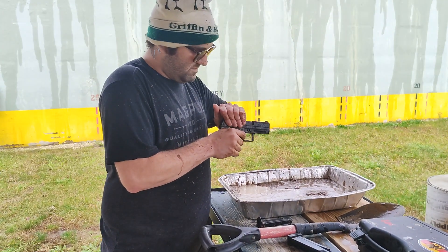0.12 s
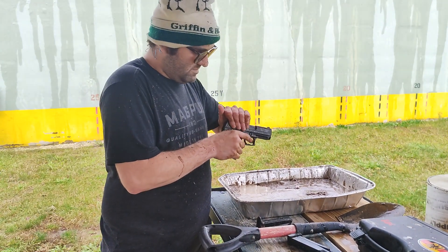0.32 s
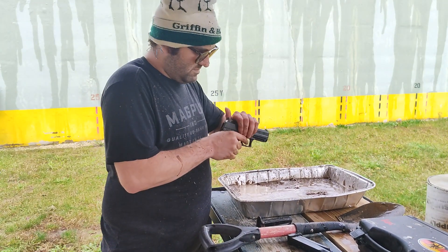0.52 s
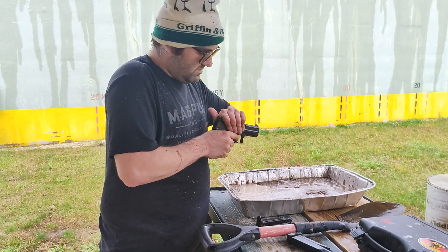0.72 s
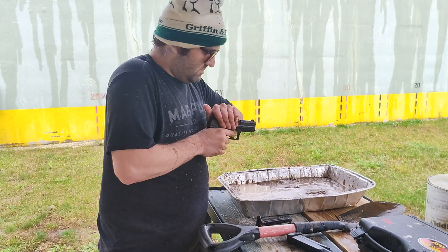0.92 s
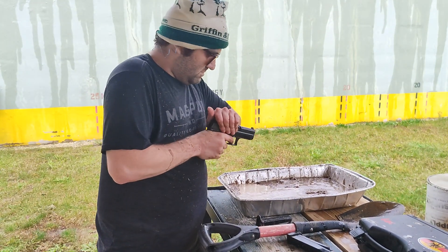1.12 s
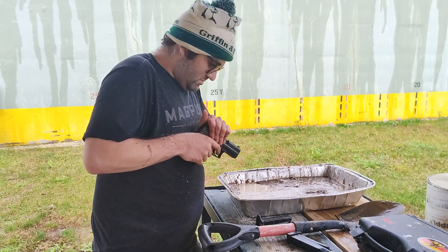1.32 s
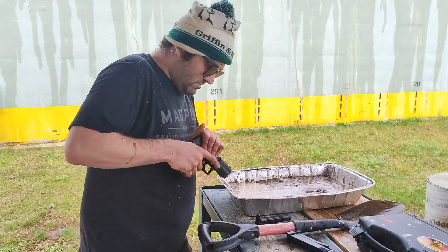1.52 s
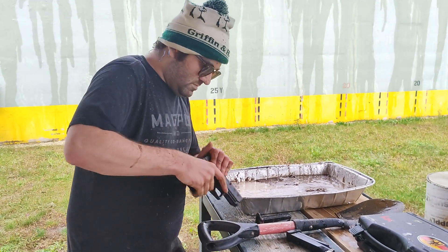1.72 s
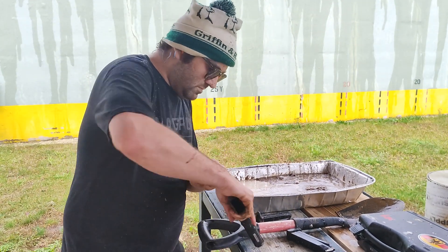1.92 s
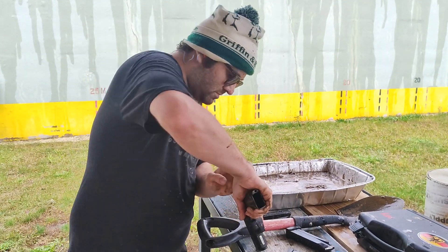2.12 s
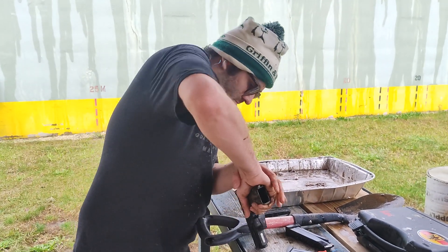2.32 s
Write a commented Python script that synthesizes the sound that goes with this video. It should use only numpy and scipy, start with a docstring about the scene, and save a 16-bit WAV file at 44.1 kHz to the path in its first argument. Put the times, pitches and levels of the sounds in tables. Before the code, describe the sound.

A jammed pistol slide is forced by hand: a faint scrape, then one loud, sharp steel slam at 0.24 s with a hollow thump and short echoes off ground and walls. Lighter clicks come at 0.42, 1.2 and 1.3 s, then tiny ticks. Soft wooden table knocks sound at 2.1 and 2.35 s with clicks. Low wind thumps on the left, quiet field hush, faint high bird chirps near 1 and 2.2 s.

```python
"""A jammed pistol slide outdoors

Hands force the slide: one loud slam and small steel clicks, made of scraping noise and dying sines.
The hollow grip thumps, then the muzzle knocks a wooden table, which booms and shakes its load.
Scattered taps and smeared noise return the blows from field and walls; a small bird sings gliding sines.
Wind thumps the left microphone port in short rough cycles, over the hush of the field in filtered noise."""
import sys
import numpy as np
from scipy import signal
from scipy.fft import rfft, irfft
from scipy.io import wavfile
from scipy.ndimage import uniform_filter1d

SR = 44100
rng = np.random.default_rng(int(sys.argv[2]) if len(sys.argv) > 2 else 0)


def volts_from_decibels(level):
    """Turn decibel levels (scalar or array-like) into linear amplitude factors."""
    exponent = np.asarray(level, float) / 20
    return 10 ** exponent


def output_pcm(signal):
    """Save a mono or channel-first signal as 16-bit PCM at the path in sys.argv[1].

    Samples are clipped to [-1, 1] before scaling.
    """
    pcm = np.clip(np.atleast_2d(signal).T, -1, 1) * 32767
    wavfile.write(sys.argv[1], SR, np.round(pcm).astype(np.int16))


N = 105840  # length of the scene in samples

# Colour of the field's hush: f/Hz, relative level per Hz/dB
HUSH_COLOUR = [(40, -18), (75, 0), (130, -9.5), (240, -15), (340, -20.5), (480, -21), (650, -14.5),
               (950, -13.5), (1400, -16.5), (2070, -10.5), (4000, -18), (8300, -26.5), (10500, -28.5),
               (13300, -22), (16300, -39.5)]
# Balance of the hush between the ports: f/Hz, left over right/dB
HUSH_BALANCE = [(60, 0.5), (400, 3.5), (1300, -4), (4400, -3), (8000, 4.5), (11000, -7.5), (15000, -11.5)]
# How alike the hush is in both ports: f/Hz, likeness (0 = unrelated, 1 = the same)
HUSH_LIKENESS = [(60, .7), (300, 0.66), (700, 0), (1400, 0), (3000, 0.054), (8000, 0.44), (15000, 0.076)]
# Rise and fall of the hush: t/s, relative level of the middle/dB, relative level of the treble/dB
HUSH_SWELL = [(0, 6, -10.5), (.09, 8.5, -2.5), (.12, 8, 0.5), (.3, 12.5, 2), (.55, 5.5, -2.5), (.68, 4, -1),
              (.72, 6, 0.5), (0.871, 3, 0), (0.901, 5, 5.5), (1.041, 2.5, -3), (1.2, 4, -4),
              (1.401, 2, -5.5), (1.65, 0, -6), (1.8, 0, 1.5), (2.001, 1, 3.5), (2.251, 0, -0.5),
              (2.32, 8, 6.5), (2.4, -2, 2.5)]
HUSH_DB, HUSH_LATE_S = -55, 0.0005  # the right port hears the hush later
PORT_HZ, PORT_WIDTH_HZ, PORT_DB = 2065, 260, -59  # narrow hiss, strongest in the right port

# Wind eddies breaking on the left port: t/s, level/dB, f/Hz, time from the middle to 1/e/s
WIND_EDDIES = [(0.051, -35.5, 80, 0.013), (0.138, -44, 73, 0.038), (0.299, -44, 73.4, 0.037),
               (0.372, -54, 87.5, 0.056), (0.464, -32.5, 90.6, 0.013), (0.5, -39.5, 80, 0.022),
               (0.607, -41, 80, 0.01), (0.684, -40, 79, 0.023), (0.782, -54.5, 65, 0.021),
               (.91, -58, 110, 0.045), (1.094, -40.5, 80, 0.0088), (1.167, -37.5, 72, .025),
               (1.222, -41, 72.3, 0.016), (1.269, -46, 93, 0.025), (1.331, -47, 60.4, 0.035),
               (1.518, -58, 70.8, 0.016), (1.64, -52.5, 69.2, 0.025), (1.8, -52.5, 83.3, 0.015),
               (1.988, -63, 74.8, .03)]
EDDY_ROUGH = 0.5  # share of a second, faster cycle
RUMBLE_DB, RUMBLE_HZ, RUMBLE_WIDTH_HZ = -63, 80, 74
WIND_RIGHT_DB = -20  # right port against left

# Steel on steel: t/s, level/dB, brightest f/Hz, fall-off per octave squared/dB (sign ignored),
# scrape's time to fall 60 dB/s (held to 0.004-0.3), left over right/dB
STEEL_STRIKES = [(0.18, -41.5, 4000, 8, 0.15, 8), (0.2024, -23, 4970, 1, 0.022, 3.5),
                 (0.2377, -4, 3140, 2.5, 0.013, 4), (.2412, -3.5, 5060, 0, 0.047, 1),
                 (.2430, -2.5, 6000, 3, 0.027, 4), (.2468, -13, 4000, 0, 0.077, -6.5),
                 (0.421, -30, 5800, 16, .03, -4), (0.423, -29, 1770, 21, 0.039, -3.5),
                 (.429, -33.5, 6940, 2, .04, 3), (.481, -36.5, 3800, 7, 0.018, 12.5),
                 (.70, -47, 7250, -4, 0.066, 0), (.889, -43, 8000, -0.5, .06, 0),
                 (1.1918, -30.5, 6200, 25, 0.014, 6), (1.285, -28, 5900, 3, 0.039, 6),
                 (1.293, -30.5, 3850, 2, 0.04, 6.5), (1.367, -49.5, 6930, 2.5, 0.021, -15.5),
                 (1.457, -45, 5000, 2, 0.082, 0), (1.459, -44.5, 13900, 14.5, 0.057, 15),
                 (1.568, -44, 11050, 11.5, .05, 8.5), (1.584, -51.5, 10000, 7.5, .02, -19),
                 (1.661, -47, 4740, -1.5, 0.034, 9.5), (1.691, -50.5, 9000, 1, 0.024, 4.5),
                 (1.809, -48, 4900, 5.5, 0.12, 3.5), (2.135, -47, 6000, -6, 0.07, 3),
                 (2.306, -47, 1220, 10, 0.03, 0), (2.307, -39.5, 3030, 1, 0.027, 6),
                 (2.337, -34, 4100, 1.5, 0.054, 5), (2.345, -31, 1920, 53, 0.034, -1.5),
                 (2.381, -42.5, 5040, -5, 0.048, 1), (2.393, -37.5, 2970, -0.5, 0.077, 7.5)]
# Ringing of the steel, damped by the hand's grip: f/Hz, relative level/dB, time to fall 60 dB/s
STEEL_MODES = [(1420, -4, .025), (2142, -6, .02), (2523, -4, .025), (2897, -2, .025), (3071, -4, .025),
               (3496, -3, .025), (3996, -8, .02), (4346, -6, .025), (5775, -2, .015), (7250, 0, .013),
               (8936, -8, .012), (11400, -9, .01), (13700, -9, .01)]
# Colour of the scraping noise: f/Hz, relative level per Hz/dB
SCRAPE_COLOUR = [(200, -60), (700, -40), (1150, -22), (1400, -4), (3000, 0), (5000, -4), (8000, -5),
                 (13000, -8), (16000, -16)]
# Balance of the pistol between the ports: f/Hz, left over right/dB
GUN_BALANCE = [(300, 4.5), (1000, 3), (2000, -2), (3000, -4), (5000, 0.5), (8000, -2), (11000, -12.5),
               (15000, -17.5)]
RING_DB, SCRAPE_DB = -11, -8
RIGHT_LATE_S = 0.00095  # the right port hears the steel later

# Scatter from ground and clutter near by: f/Hz, time to fall 60 dB/s
NEAR_DECAY = [(500, 0.34), (1000, 0.18), (2500, 0.29), (5000, 0.25), (10000, 0.12), (16000, 0.27)]
# Scatter from far off: f/Hz, time to fall 60 dB/s
FAR_DECAY = [(500, 1.2), (2500, 1), (8000, 1), (16000, 0.69)]
# Smeared slaps off walls: delay t/s, level/dB, time to fall 60 dB/s
WALL_SLAPS = [(.047, -27.5, 0.042), (.150, -27.5, .09)]
NEAR_DB, FAR_DB = -7, -25.5

# Thumps of the hollow grip under some of the blows: t/s, level/dB
GRIP_THUMPS = [(.203, -42.5), (.238, -17), (1.284, -34), (1.458, -52.5), (1.66, -51), (2.338, -50)]
# Notes of the grip's cavity: f/Hz, relative level/dB, time to fall 60 dB/s
GRIP_MODES = [(960.5, 0, 0.062), (1055, -9.5, 0.044), (769, -18, 0.052)]
# Clean returns of the thump off the walls: delay t/s, level/dB
GRIP_RETURNS = [(.045, -15), (.153, -19.5)]
GRIP_RISE_S = 0.0094

# Chirps of the bird: start t/s, length t/s, level/dB, highest f/Hz of the top line before wobble
BIRD_CHIRPS = [(0.895, 0.06, -59, 8580), (0.967, 0.034, -55, 8730), (0.99, .025, -61, 7580),
               (1.03, 0.056, -56, 8910), (1.123, 0.05, -57.5, 8620), (2.105, 0.055, -58, 8620),
               (2.17, 0.039, -55, 8840), (2.244, 0.054, -57, 8810)]
# Lines of one chirp: distance under the top line f/Hz, level/dB
CHIRP_LINES = [(0, -1.5), (900, 0.5), (1800, -14)]
CHIRP_RISE_HZ, CHIRP_FALL_HZ = 1437, 706
CHIRP_TOP = 0.54  # share of the chirp gone by at its highest pitch
WOBBLE_HZ = 110  # typical (rms) size of the wobble
CHIRP_WET_DB = 4

# Blows of the muzzle on the table: t/s, level/dB, left over right/dB
TABLE_KNOCKS = [(2.118, -35.5, 0), (2.126, -45, -3), (2.298, -48, 3), (2.335, -39, -2.5), (2.344, -38.5, 5),
                (2.39, -51.5, 8)]
# Booming of the wooden top: f/Hz, relative level/dB (varies by blow), time to fall 60 dB/s
TABLE_MODES = [(79, 3.5, 0.1), (118.4, -10.5, 0.38), (174.8, 1.5, 0.28), (199.6, -9.5, 0.15),
               (282, -13, .2), (393, -17.5, 0.12), (544, -15.5, 0.068), (660, -20, 0.076)]
# Colour of the things shaking on the table: f/Hz, relative level per Hz/dB
CLUTTER_COLOUR = [(100, -19), (250, -7), (500, -4.5), (1000, -9), (2500, -6.5), (6000, -44)]
CLUTTER_DB, CLUTTER_T60_S = -21, 0.35


def evened(x):
    """Brings a sound to an rms (average strength) of 1."""
    return x / np.sqrt(np.mean(x ** 2) + 1e-20)


def read(points, hz):
    """Reads a curve between its points, along a logarithmic pitch scale."""
    f, value = np.transpose(points)
    return np.interp(np.log(hz + 1), np.log(f + 1), value)


def add(mix, s, sound):
    """Lays a sound into the mix at s seconds, cutting what runs past the end."""
    part = mix[..., round(s * SR):round(s * SR) + sound.shape[-1]]
    part += sound[..., :part.shape[-1]]


def sides(db):
    """Splits a left-over-right difference in dB into a gain for each port."""
    return volts_from_decibels(np.array([db / 2, -db / 2]))


def coloured(x, gain_at):
    """Filters along the last axis by a gain given for each frequency."""
    spectrum = rfft(x)
    hz = np.fft.rfftfreq(x.shape[-1], 1 / SR)
    return irfft(spectrum * gain_at(hz), x.shape[-1])


def hush():
    """Distant leaves and traffic: patchy noise whose middle and treble swell apart."""
    frames, hz = N // 256 + 5, np.fft.rfftfreq(1024, 1 / SR)
    a, b, c, d, patches = rng.standard_normal((frames, 513, 5)).T
    patches = uniform_filter1d(patches, size=12, axis=0)
    patches = evened(uniform_filter1d(patches, size=10, axis=1))
    t = np.arange(frames) * 256 / SR - 512 / SR
    s, middle, treble = np.transpose(HUSH_SWELL)
    # the treble's swell takes over between 6 and 12 kHz
    share = np.clip(np.log2(hz / 6000 + 1e-9), 0, 1)[:, None]
    swell = (1 - share) * np.interp(t, s, middle) + share * np.interp(t, s, treble)
    same = np.clip(read(HUSH_LIKENESS, hz), -1, 1)[:, None]
    left = a + 1j * b
    right = same * left + np.sqrt(1 - same ** 2) * (c + 1j * d)
    z = np.array([left, right])
    gain = volts_from_decibels(read(HUSH_COLOUR, hz)) * sides(read(HUSH_BALANCE, hz))
    z *= gain[:, :, None] * volts_from_decibels(0.85 * patches + swell)
    z[1] *= np.exp(-2j * np.pi * hz * HUSH_LATE_S)[:, None]  # turning phases delays the right port
    noise = signal.istft(z, nperseg=1024, noverlap=768)[1][:, :N]
    return volts_from_decibels(HUSH_DB) * evened(noise)


def port_hiss():
    """A narrow band of noise heard almost only on the right."""
    noise = rng.standard_normal(N)
    band = coloured(noise, lambda f: 1 / (1 + ((f - PORT_HZ) * 2 / PORT_WIDTH_HZ) ** 2))
    return volts_from_decibels(PORT_DB) * evened(band) * volts_from_decibels(np.array([[-25], [0]]))


def wind():
    """Eddies thump the left port with a few rough cycles each, over a faint rumble of low noise."""
    t = np.arange(-4096, 4096) / SR
    noise = rng.standard_normal(N)
    rumble = coloured(noise, lambda f: f / (1 + ((f - RUMBLE_HZ) * 2 / RUMBLE_WIDTH_HZ) ** 2) ** 2)
    left = volts_from_decibels(RUMBLE_DB) * evened(rumble)
    for s, db, hz, half in WIND_EDDIES:
        turn = 2 * np.pi * rng.random(2)
        cycles = np.sin(2 * np.pi * hz * t + turn[0])
        cycles = cycles + EDDY_ROUGH * np.sin(2 * np.pi * 1.7 * hz * t + turn[1])
        thump = volts_from_decibels(db) * np.exp(-(t / half) ** 2) * cycles
        skip = max(4096 - round(s * SR), 0)  # leave out what falls before the start
        add(left, s - (4096 - skip) / SR, thump[skip:])
    return left * volts_from_decibels(np.array([[0], [WIND_RIGHT_DB]]))


def ring(modes, t, spread_db, colour):
    """Dying sines of struck steel; every blow and port hears each one a little differently."""
    hz, db, t60 = np.transpose(modes)[:, :, None]
    luck = rng.standard_normal((2, 2, len(modes), 1))  # for level and phase, in two ports
    balance = read(GUN_BALANCE, hz) * np.array([.5, -.5])[:, None, None]
    level = db + spread_db * luck[0] + colour(hz) + balance
    phase = luck[1] * np.log2(hz / 700)
    return (volts_from_decibels(level - 60 * t / t60) * np.sin(2 * np.pi * hz * t + phase)).sum(1)


def strike(s, db, top_hz, fall_db, scrape_t60, pan_db):
    """Steel hits steel: a burst of scraping noise and dying sines, brightened around top_hz."""
    t = np.arange(8192) / SR

    def colour(f):
        return -abs(fall_db) * np.log2((f + 1) / top_hz) ** 2

    def scrape_gain(f):
        return volts_from_decibels(read(SCRAPE_COLOUR, f) + colour(f)) * sides(read(GUN_BALANCE, f))

    noise = evened(coloured(rng.standard_normal((2, len(t))), scrape_gain))
    scrape = volts_from_decibels(SCRAPE_DB - 60 * t / np.clip(scrape_t60, .004, .3)) * noise
    steel = volts_from_decibels(RING_DB) * ring(STEEL_MODES, t, 1.24, colour)
    both = (scrape + steel) * np.minimum(t / 0.00088, 1)  # rises within a millisecond
    both[1] = np.interp(t - RIGHT_LATE_S, t, both[1], left=0)
    return s, volts_from_decibels(db) * sides(pan_db)[:, None] * both


def scatter(decay, start_s):
    """Sparse echoes of random sign, each band dying at its own speed, other echoes per port."""
    taps = np.zeros((2, SR))
    at = np.arange(round(start_s * SR), SR - 20, 20)
    at = at + rng.integers(0, 20, (2, len(at)))
    np.put_along_axis(taps, at, rng.choice([-1., 1.], at.shape), 1)
    hz, t, z = signal.stft(taps, SR, nperseg=256)
    fading = volts_from_decibels(-60 * t / read(decay, hz)[:, None])
    tail = signal.istft(z * fading, SR, nperseg=256)[1]
    return tail[:, :SR] / np.linalg.norm(tail[0])


def space():
    """Echoes of ground and clutter near by, far scatter, and slaps off walls smeared into noise."""
    out = volts_from_decibels(NEAR_DB) * scatter(NEAR_DECAY, .004) + volts_from_decibels(FAR_DB) * scatter(FAR_DECAY, 0.038)
    t = np.arange(4096) / SR
    for delay, db, t60 in WALL_SLAPS:
        slap = rng.standard_normal((2, len(t))) * volts_from_decibels(-60 * t / t60)
        add(out, delay, volts_from_decibels(db) * slap / np.linalg.norm(slap[0]))
    return out


def grip():
    """The grip's cavity sounds a short hollow note of dying sines, and the walls return it."""
    t, out = np.arange(8192) / SR, np.zeros(N)
    hz, mode_db, t60 = np.transpose(GRIP_MODES)[:, :, None]
    note = (volts_from_decibels(mode_db - 60 * t / t60) * np.sin(2 * np.pi * hz * t)).sum(0)
    note = note * np.sin(np.pi / 2 * np.minimum(t / GRIP_RISE_S, 1)) ** 2
    for s, db in GRIP_THUMPS:
        add(out, s, volts_from_decibels(db) * note)
        for delay, echo_db in GRIP_RETURNS:
            add(out, s + delay, volts_from_decibels(db + echo_db) * note)
    return out * sides(3.3)[:, None]  # a little louder on the left


def chirp(s, length, db, top_hz):
    """The bird's voice: three unsteady sines climb to a rounded top and drop away."""
    t = np.arange(0, length, 1 / SR)
    u = t / length - CHIRP_TOP
    rise = CHIRP_RISE_HZ * (u / CHIRP_TOP) ** 2
    fall = CHIRP_FALL_HZ * (u / (1 - CHIRP_TOP)) ** 2
    hz = top_hz - np.where(u < 0, rise, fall)
    wobble = uniform_filter1d(rng.standard_normal((len(CHIRP_LINES), 4096)), size=40)[:, :len(t)]
    lines = np.zeros(len(t))
    for (under, line_db), w in zip(CHIRP_LINES, wobble):
        line_hz = hz - under + WOBBLE_HZ * evened(w)
        lines += volts_from_decibels(line_db) * np.sin(2 * np.pi * np.cumsum(line_hz) / SR)
    return s, volts_from_decibels(db) * np.sin(np.pi * t / length) ** 0.56 * lines


def bird():
    """Chirps with a short scatter off leaves, reaching the right port slightly later."""
    song = np.zeros(N)
    for row in BIRD_CHIRPS:
        add(song, *chirp(*row))
    leaves = scatter([(5000, .1), (10000, .08)], .002)[:, :8192]  # f/Hz, time to fall 60 dB/s
    both = song + volts_from_decibels(CHIRP_WET_DB) * signal.fftconvolve(song[None], leaves, axes=1)[:, :N]
    both[1] = np.roll(both[1], 25)  # delay in samples
    return both


def knock(s, db, pan_db):
    """A soft blow sets the wood booming in dying sines and its load shaking in noise."""
    t = np.arange(SR // 2) / SR
    hz, mode_db, t60 = np.transpose(TABLE_MODES)[:, :, None]
    mode_db = mode_db + rng.standard_normal(hz.shape)
    boom = (volts_from_decibels(mode_db - 60 * t / t60) * np.sin(2 * np.pi * hz * t)).sum(0)
    noise = rng.standard_normal(len(t))
    shake = evened(coloured(noise, lambda f: volts_from_decibels(read(CLUTTER_COLOUR, f))))
    blow = boom + volts_from_decibels(CLUTTER_DB - 60 * t / CLUTTER_T60_S) * shake
    blow = blow * np.sin(np.pi / 2 * np.minimum(t / .006, 1)) ** 2  # soft start over 6 ms
    return s, volts_from_decibels(db) * sides(pan_db)[:, None] * blow


def scene():
    """Adds up hush, hiss, wind, steel with its echoes, grip, bird and table."""
    gun, table = np.zeros((2, N)), np.zeros((2, N))
    for row in STEEL_STRIKES:
        add(gun, *strike(*row))
    for row in TABLE_KNOCKS:
        add(table, *knock(*row))
    echoes = signal.fftconvolve(gun, space(), axes=1)[:, :N]
    return hush() + port_hiss() + wind() + gun + echoes + grip() + bird() + table


def band_limit(x):
    """A steep low-pass at the top of the band."""
    return signal.sosfilt(signal.butter(12, 16460, fs=SR, output="sos"), x)


def record(dry):
    """The microphones cut the deep bass, then a steep filter takes off the highest treble."""
    bass_cut = signal.butter(2, 38, "highpass", fs=SR, output="sos")  # Hz
    x = signal.sosfilt(bass_cut, dry)
    treble_cut = signal.firwin(511, 16300, window=("kaiser", 9), fs=SR)  # edge in Hz
    mix = signal.oaconvolve(x, treble_cut[None], "same")
    return band_limit(mix)


dry = scene()
out = record(dry)
output_pcm(out)
```